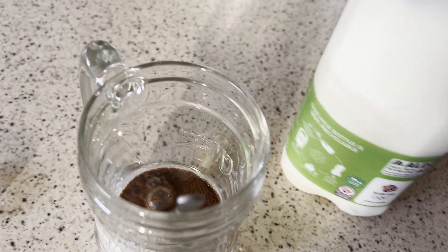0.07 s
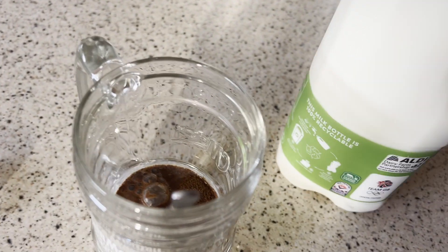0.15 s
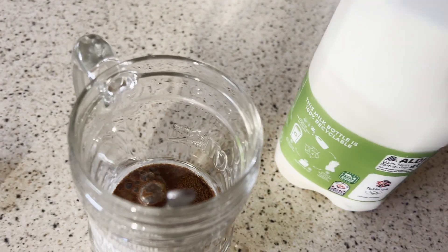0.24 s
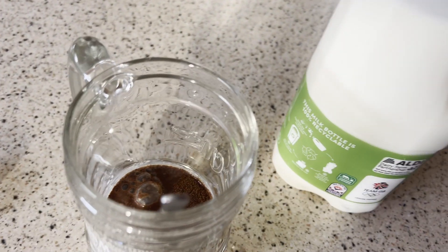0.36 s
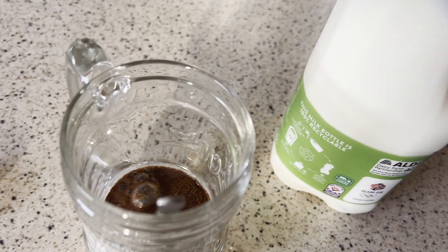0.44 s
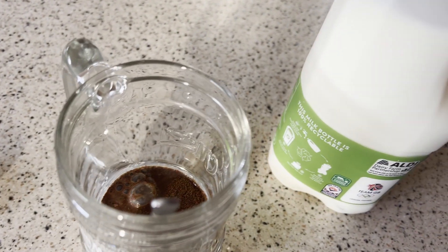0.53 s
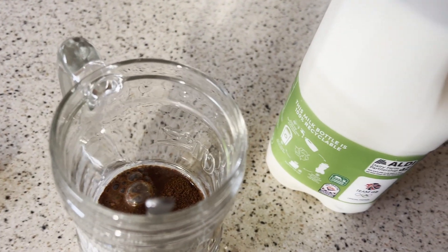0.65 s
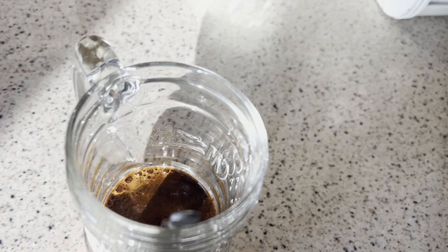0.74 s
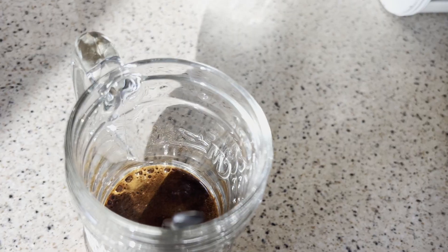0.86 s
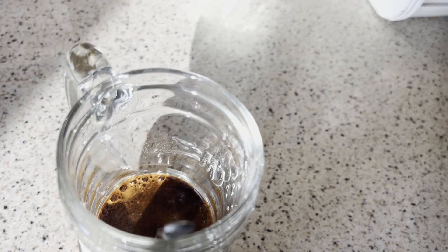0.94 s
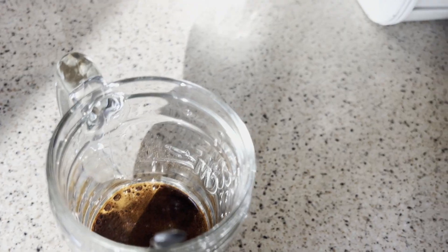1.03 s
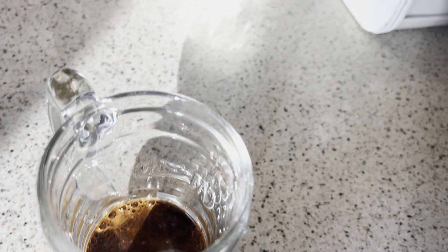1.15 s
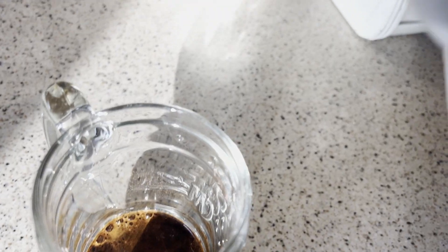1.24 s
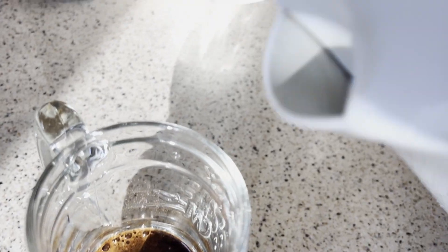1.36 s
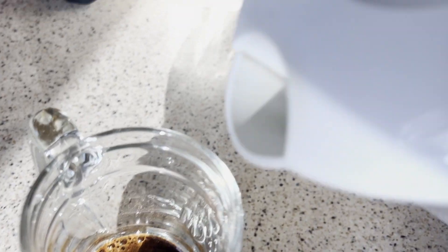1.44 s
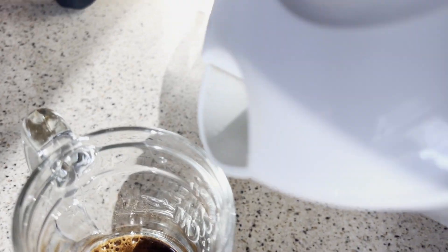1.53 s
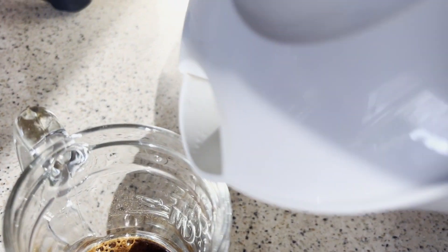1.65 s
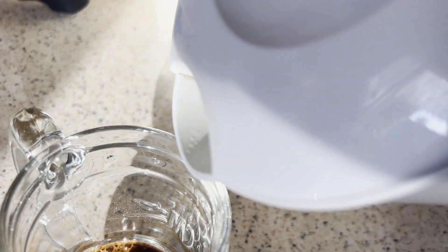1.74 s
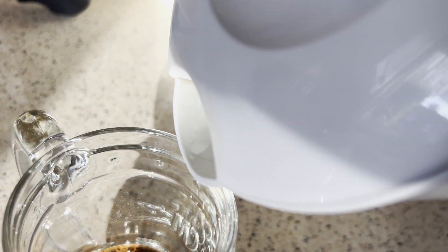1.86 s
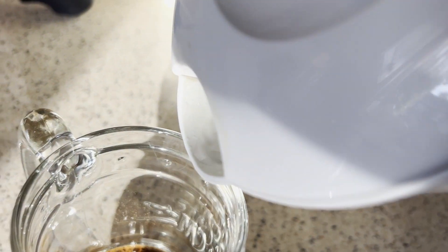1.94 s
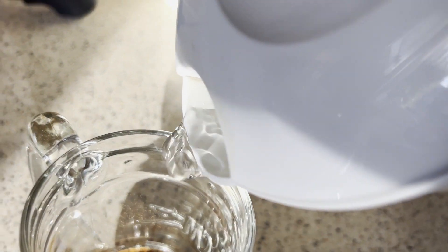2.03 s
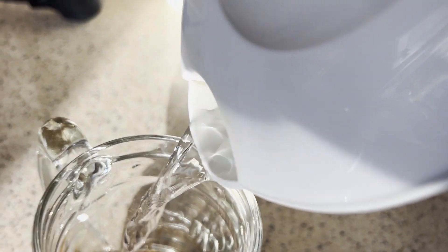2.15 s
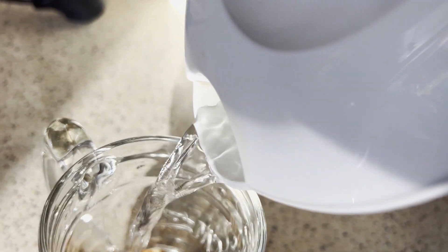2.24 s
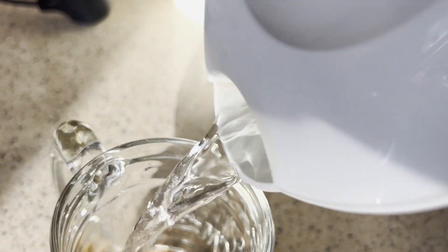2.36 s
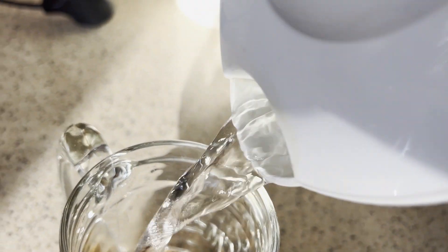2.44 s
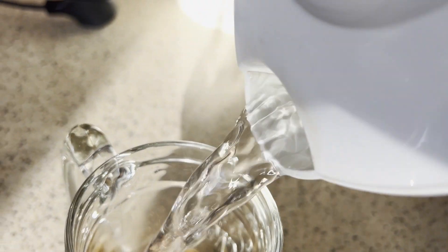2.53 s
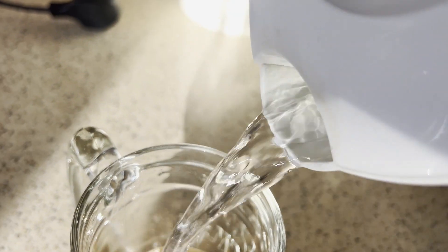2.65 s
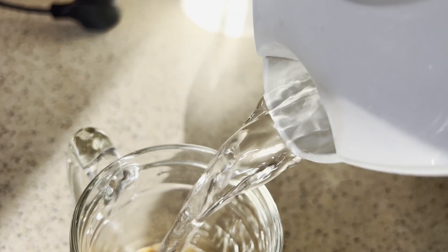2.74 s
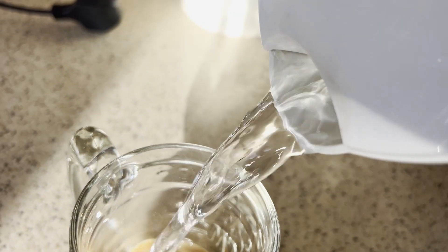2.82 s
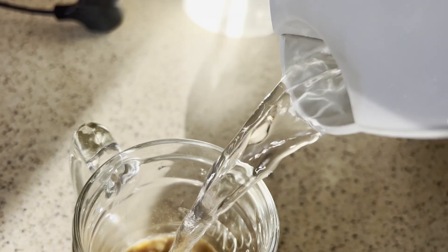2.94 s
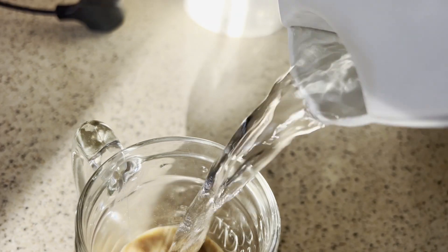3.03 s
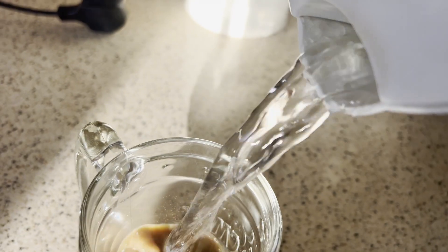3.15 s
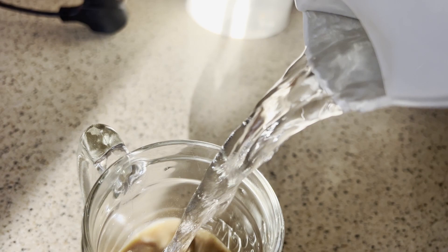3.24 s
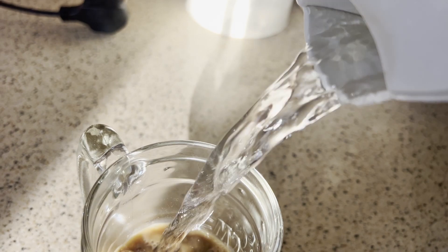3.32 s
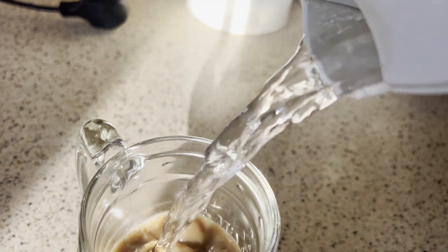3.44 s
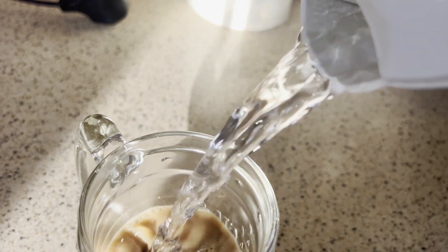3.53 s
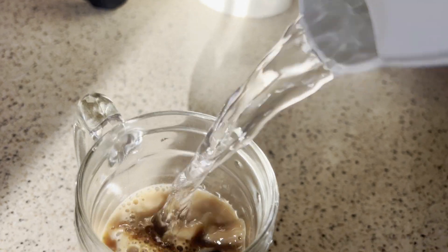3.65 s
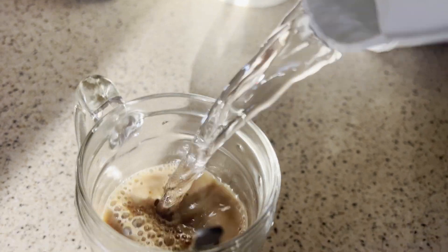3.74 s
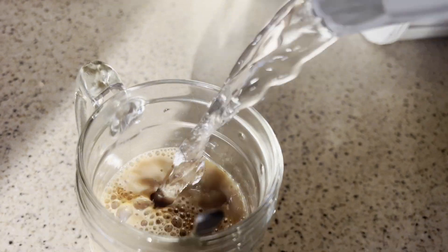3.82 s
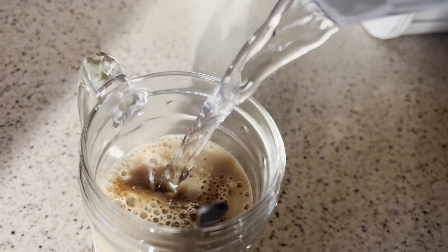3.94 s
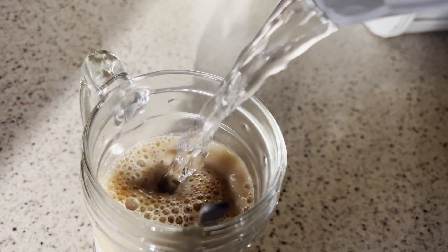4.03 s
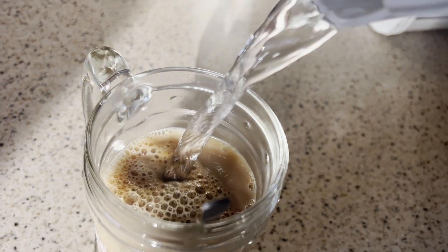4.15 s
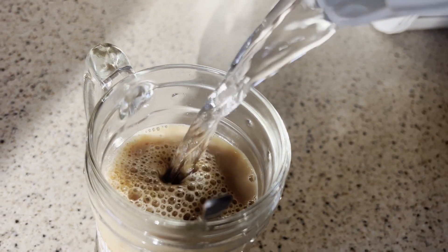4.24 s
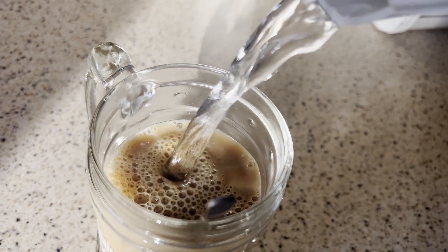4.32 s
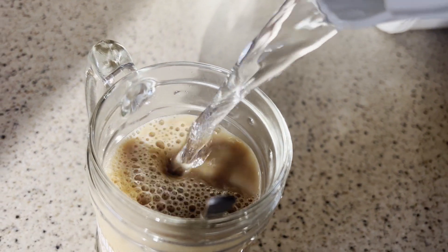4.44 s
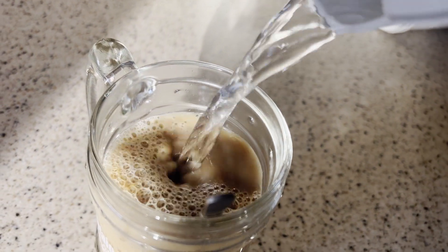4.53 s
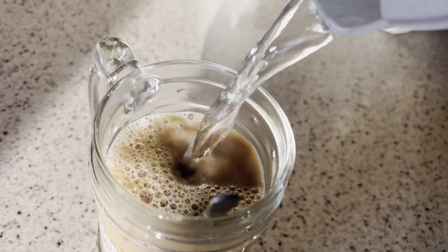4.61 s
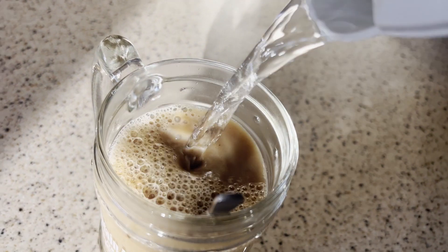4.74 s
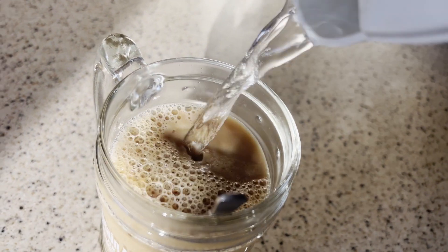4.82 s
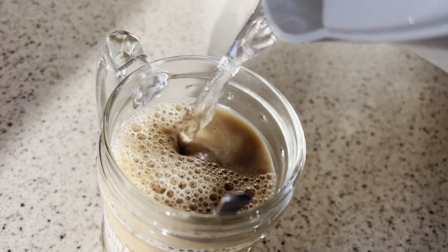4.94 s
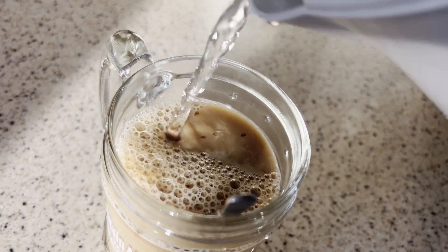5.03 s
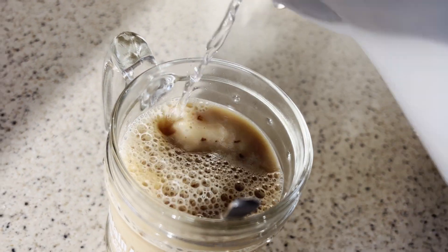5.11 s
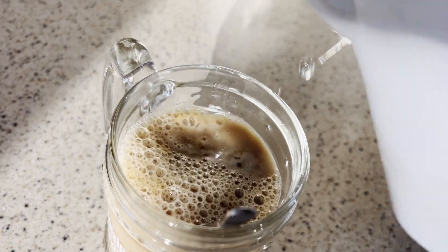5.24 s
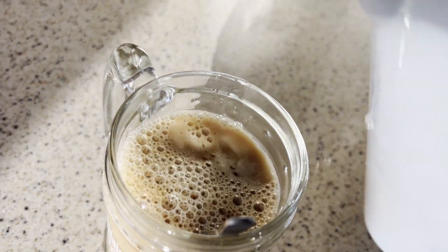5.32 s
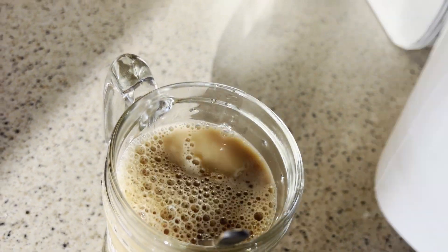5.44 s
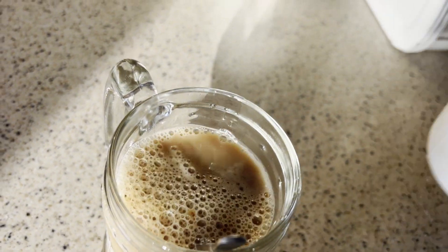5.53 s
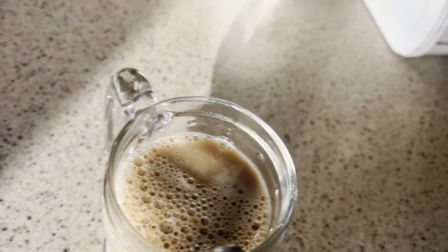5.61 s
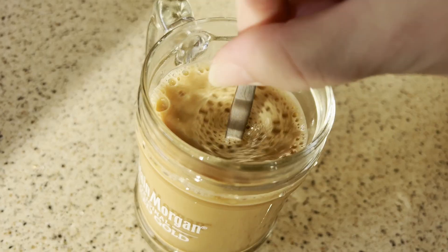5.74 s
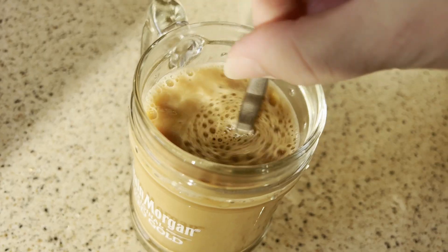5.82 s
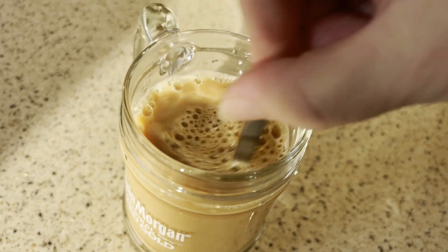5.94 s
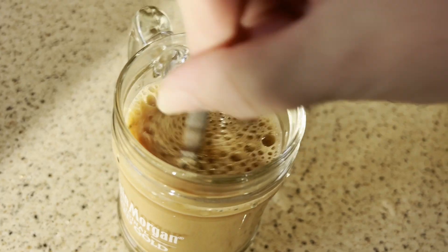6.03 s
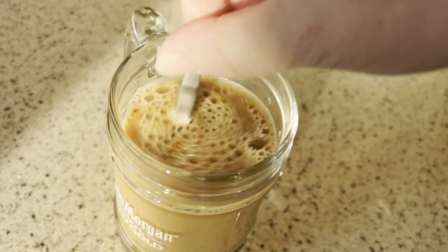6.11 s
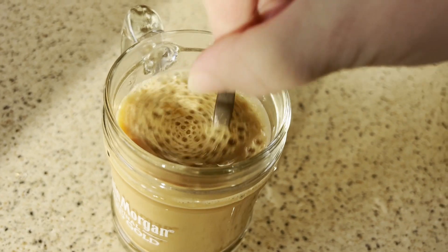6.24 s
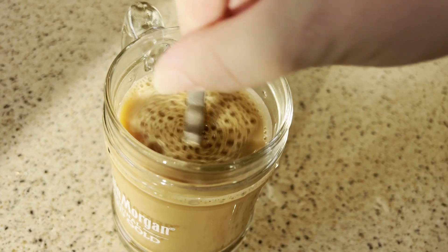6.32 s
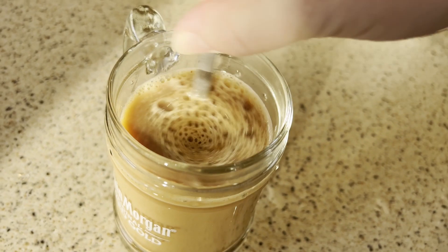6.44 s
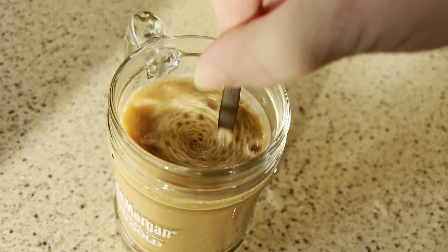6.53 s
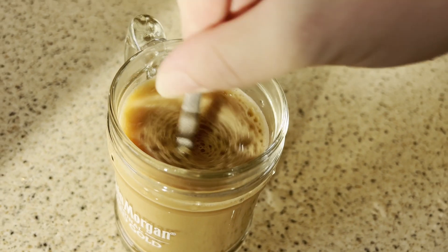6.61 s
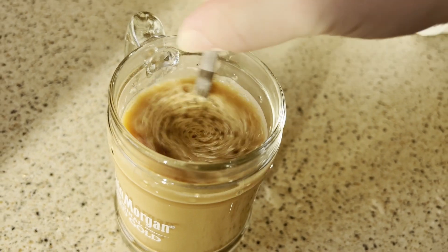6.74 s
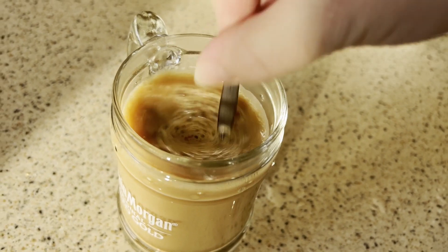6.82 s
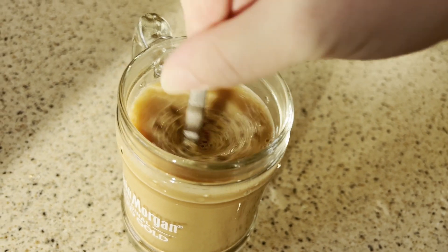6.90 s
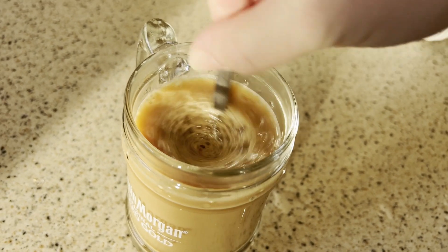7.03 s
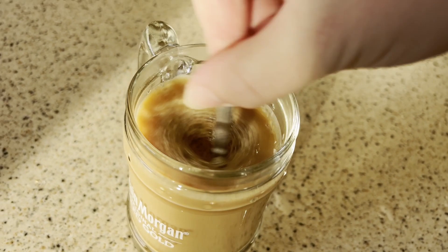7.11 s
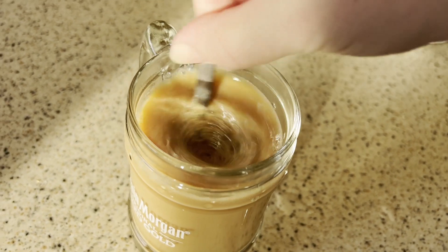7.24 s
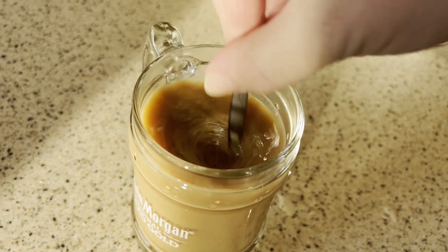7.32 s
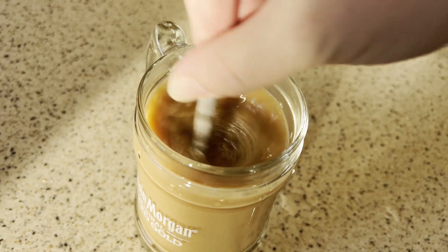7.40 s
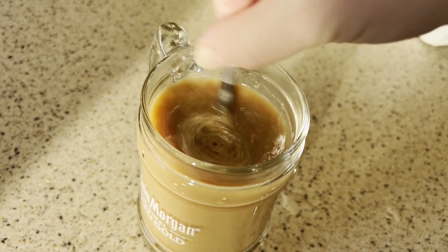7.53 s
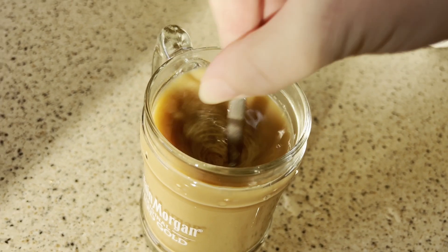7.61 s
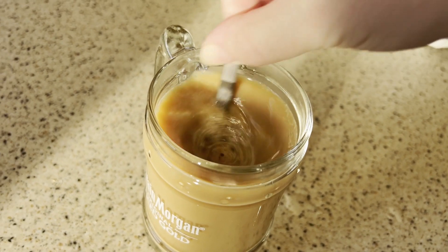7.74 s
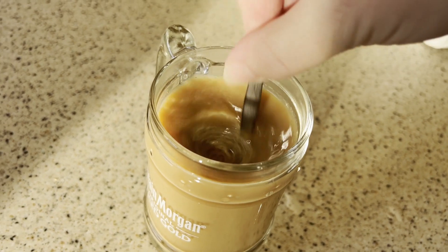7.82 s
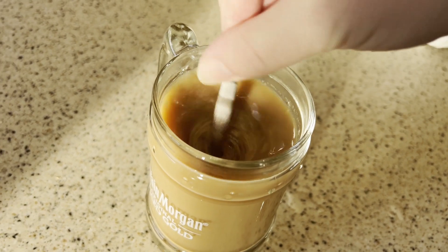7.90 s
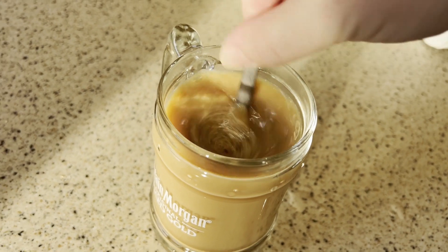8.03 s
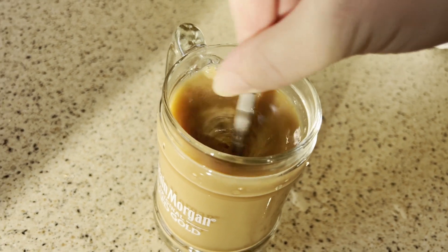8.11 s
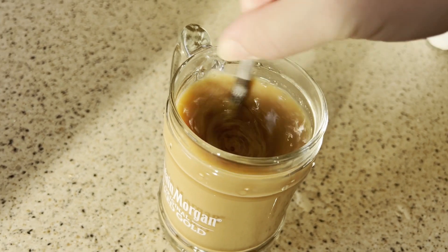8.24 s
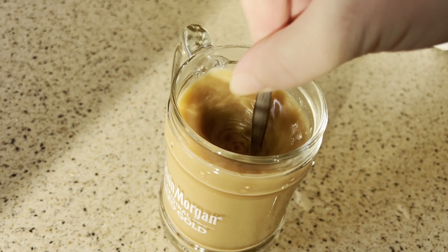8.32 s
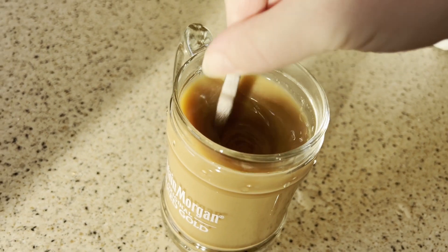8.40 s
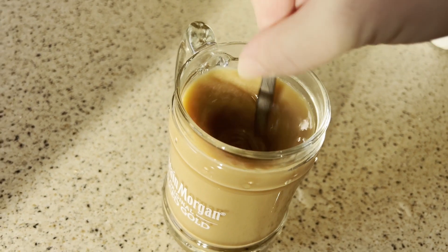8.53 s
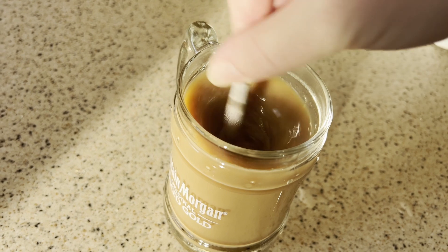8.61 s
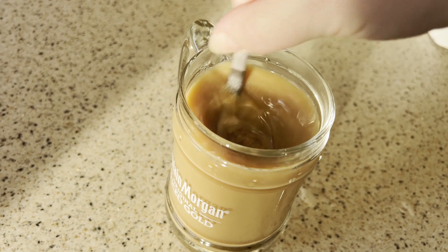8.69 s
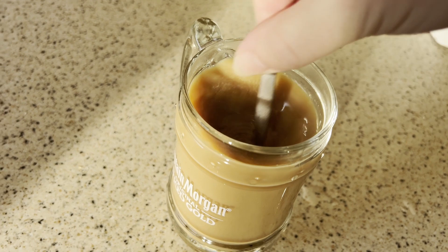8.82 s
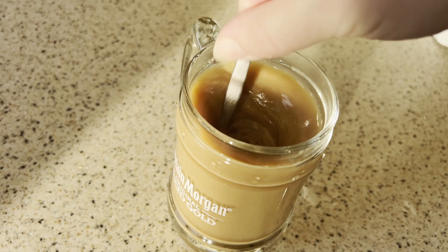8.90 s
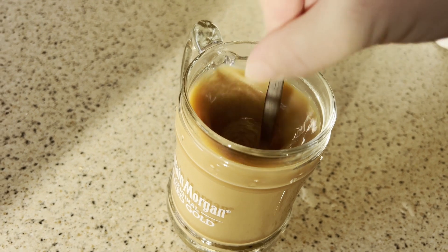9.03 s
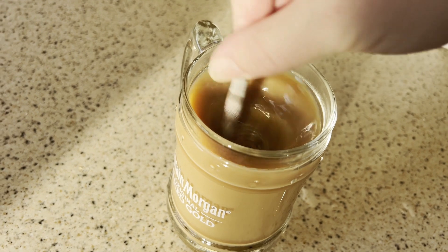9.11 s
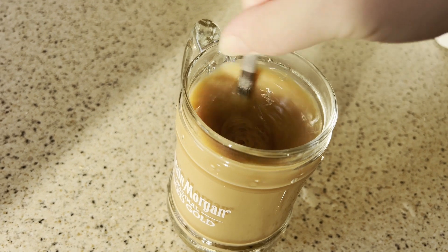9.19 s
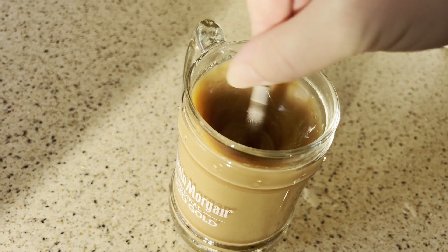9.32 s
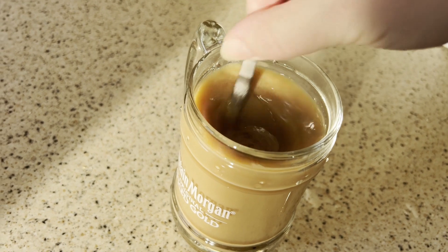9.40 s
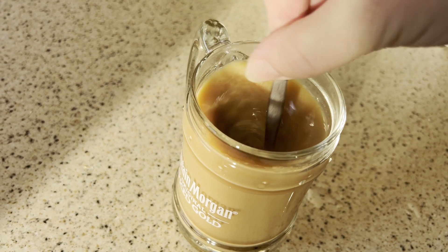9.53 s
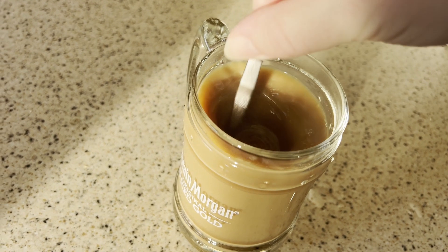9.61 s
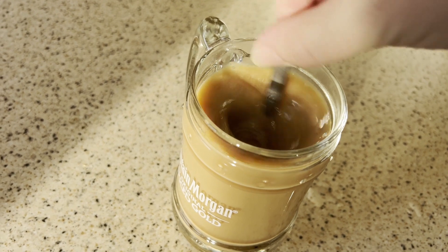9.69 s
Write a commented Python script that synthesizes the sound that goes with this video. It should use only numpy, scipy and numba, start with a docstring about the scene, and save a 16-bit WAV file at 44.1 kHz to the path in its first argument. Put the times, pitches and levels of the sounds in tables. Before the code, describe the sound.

Close stereo pickup in a small hard kitchen. A short gritty scrape and dull bump on the worktop, a faint kettle switch click, then a quiet gap. Hot water pours into a glass mug, splashing and gurgling, its hollow ring rising as it fills while the mug's low tone sinks. The flow thins, foam fizzes, and a metal spoon stirs briskly with irregular clinks and soft worktop booms to the end.

```python
"""Something scrapes over a worktop, a kettle clicks off, and hot water is poured into a glass mug for instant coffee.
Splashes and bubbles ring the air above the liquid, higher as the mug fills, while the loaded mug sinks in pitch.
Then a steel spoon stirs: each knock rings the liquid-damped glass and makes the worktop boom.
Foam fizzes, the coffee laps, and a small hard room answers over a low house rumble."""
import sys
import numpy as np
from scipy import signal
from scipy.fft import rfft, irfft, next_fast_len
from scipy.io import wavfile
from numba import njit

SR = 44100
rng = np.random.default_rng(int(sys.argv[2]) if len(sys.argv) > 2 else 0)


def digitize_waveform(pressure):
    """Quantize a signal to 16-bit integers and store it at the path in sys.argv[1].

    Rows of a 2-D input are taken as channels; values are limited to [-1, 1].
    """
    field = np.atleast_2d(pressure).T
    bounded = np.clip(field, -1, 1)
    quanta = np.round(bounded * 32767).astype(np.int16)
    wavfile.write(sys.argv[1], SR, quanta)


N = 430416
T = np.arange(N) / SR  # time in s
AGE = T[:SR // 10]  # time since the start of a short sound, in s
POUR_START_S, POUR_END_S = 2.21, 5.75

# strength of the stream from the kettle: start_s, level_db [s, dB]
FLOW = [(2.22, -58.5), (2.4, -49), (2.47, -47), (3.57, -47), (3.71, -47.5), (3.82, -51.5), (4.96, -60),
        (5.56, -79), (5.7, -104)]
# spoon knocks; hard steel-on-glass contacts tick, deep ones ring the base:
# start_s, strength_db, hardness_db, depth_db [s, dB, dB, dB]
KNOCKS = [(5.8769, -18, -13.5, -33), (5.901, -19, -19, -30), (5.9118, -22.5, -19, -22),
          (5.9888, -22.5, -21.5, -20), (6.0132, -24.5, -38, -21), (6.106, -20.5, -30.5, -13.5),
          (6.1999, -14, -21.5, -20.5), (6.2371, -29, -23, -13), (6.331, -34, -34, -7.5),
          (6.4951, -24, -10.5, -20.5), (6.5933, -22, -16, -16), (6.7712, -21, -16, -16.5),
          (6.8603, -19.5, -26.5, -8.5), (6.974, -28, -25, -30), (7.007, -28, -36, -12.5),
          (7.0549, -26, -13.5, -33), (7.1214, -25.5, -24.5, -8.5), (7.2012, -27.5, -8, -18),
          (7.2855, -23, -24, -9.5), (7.378, -22.5, -28, -8.5), (7.4732, -27.5, -19, -13),
          (7.5608, -31, -20.5, -12.5), (7.6386, -20.5, -17, -16.5), (7.745, -34.5, -23, -6.5),
          (7.8259, -24, -25, -15.5), (7.871, -24, -37, -12), (7.9911, -36.5, -25, -6),
          (8.104, -19, -11, -15.5), (8.2774, -18.5, -17.5, -9), (8.331, -20.5, -25, -44),
          (8.3706, -17, -23, -22.5), (8.4268, -32.5, -2.5, -17), (8.5026, -21.5, -8.5, -12),
          (8.6008, -20, -18.5, -18), (8.6793, -20.5, -22, -11), (8.7089, -24.5, -23.5, -22),
          (8.8549, -21.5, -17.5, -21), (8.8829, -29, -25, -31), (8.921, -29, -11.5, -21),
          (8.98, -30, -12.5, -32), (9.0352, -26, -27, -8.5), (9.0778, -20.5, -28, -13),
          (9.1472, -25.5, -14, -18), (9.181, -26.5, -27, -13.5), (9.2284, -33.5, -11.5, -4),
          (9.3017, -24, -20, -32), (9.3217, -18, -26.5, -11.5), (9.3885, -25, -16.5, -21),
          (9.434, -22, -24.5, -14), (9.5421, -20, -17, -37), (9.5871, -27.5, -17, -17.5),
          (9.6083, -23, -24, -29), (9.6289, -26, -12, -25), (9.7242, -16, -18, -28)]
# what the full mug and the spoon ring with: pitch_hz, t60_s, level_db [Hz, s, dB]
MUG_MODES = [(453.4, 0.048, -5.5), (571, 0.026, 3.5), (659, 0.068, -3), (730.5, 0.13, -9.5),
             (946, 0.025, 6.5), (1077, 0.0067, -12), (1213, 0.047, -2), (1420, 0.042, -11),
             (1466, 0.021, 8.5), (1533, 0.05, -3), (1711, 0.078, -11.5), (2010, 0.15, -15.5),
             (2180, 0.019, 8.5), (2384, 0.029, 0.5), (2617, 0.026, 10.5), (2836, 0.024, 6.5),
             (3475, 0.023, 6.5), (3832, 0.021, 9), (4206, 0.025, 8.5), (5183, .015, -43), (5960, 0.0047, 9),
             (7010, 0.027, -1.5), (7665, 0.015, 8), (8360, 0.032, 1.5)]
# strength of the swirling liquid and foam: start_s, level_db [s, dB]
SWIRL_LEVEL = [(5.72, -68), (6.4, -69), (7.2, -53), (8.0, -69), (8.6, -56), (9.76, -66.5)]


def stream():
    """Bubbles ring the air in the mug, churning shakes the mug and swarms of tiny bubbles crackle above."""
    # spray colour: pitch_hz, level_db [Hz, dB]
    spray_colour = [(900, -27), (2000, 10), (2500, 2), (3050, -9.5), (3800, 0), (5500, -2.5), (8000, -4.5),
                    (10000, 1.5), (12500, -1), (16000, 10)]
    bubbling_db, churning_db = -4.5, -8.5  # against the flow
    spray_db, spray_share = -15.5, 0.91  # the share is dB of spray per dB of flow
    # at first the milk is shallow: the stream bubbles almost as loudly but hardly churns
    shallow_bubbling_db, shallow_churn_db = -1, -40
    # the stream's head spatters as it lands, coming and going at this rate
    spatter_s, spatter_db, spatter_db_per_s = 2.28, -46, 208

    flow_db, = curves(FLOW)
    air_hz, mug_hz = filling()
    bubble_level_db = flow_db + bubbling_db + shallow_bubbling_db * shallow()
    churn_level_db = flow_db + churning_db + shallow_churn_db * shallow()
    spatter_level_db = spatter_db - spatter_db_per_s * np.abs(T - spatter_s)
    spray_level_db = np.maximum(spray_share * flow_db + spray_db, spatter_level_db)

    bubble_times = bursts(POUR_START_S, POUR_END_S, count=260, size=6)
    push = bubbles(bubble_times, 603, 1580, cycles=15.7, spread_db=4.5)
    splatter = noise(N, apart=0.27) + 8 * patter(rate=270, spread_db=7)
    push = push + amp(-2.5) * lag(splatter, 0.00034)
    air = np.array([resonate(resonate(p, air_hz, 3.7), air_hz, 0.84) for p in push])

    shove = noise(N, apart=0.37) + 9 * patter(rate=170, spread_db=6.5)
    churn = np.array([resonate(resonate(p, mug_hz, 4.6), mug_hz, 0.16) for p in shove])
    churn = churn + amp(-15.0) * band(shove, 347, 556)

    fizz_times = bursts(POUR_START_S, POUR_END_S, count=230, size=14)
    fizz = bubbles(fizz_times, 2480, 13600, cycles=39, spread_db=5.5)
    spray = colour(fizz + amp(-7.0) * unit(noise(N, apart=0.95)), spray_colour)
    # the stream wobbles, so its spray comes in surges
    surge_db = 4 * np.interp(T, np.linspace(0, T[-1], 400), rng.standard_normal(400))
    spray = spray * amp(surge_db)

    water = unit(air) * amp(bubble_level_db) * pan(db=8.5)
    water = water + unit(churn) * amp(churn_level_db) * pan(db=5.5)
    water = water + unit(spray) * amp(spray_level_db) * pan(db=5.5)
    return between(POUR_START_S, POUR_END_S) * water


def filling():
    """As the flow fills the mug, the shorter air column rises in pitch and the loaded mug sinks; gives both in Hz."""
    air_empty_hz, air_full_hz = 823, 1380
    mug_empty_hz, mug_full_hz = 540, 129.5
    flow_db, = curves(FLOW)
    poured = np.cumsum(amp(flow_db) ** 2 * between(POUR_START_S, POUR_END_S))
    fill = poured / poured[-1]
    air_hz = 1 / ((1 - fill) / air_empty_hz + fill / air_full_hz)
    mug_hz = mug_empty_hz * (mug_full_hz / mug_empty_hz) ** fill
    return air_hz, mug_hz


def shallow():
    """One as the pour starts, falling to zero as the liquid gains depth."""
    return np.exp(-(after(POUR_START_S) / 0.23) ** 2)


def gulps():
    """Big air pockets go under: tiny bubbles splash, the air in the mug rings and the mug thumps the worktop."""
    # air pockets driven under by the stream; splash and thump are against the strength, before the trims below:
    # start_s, strength_db, splash_db, thump_db [s, dB, dB, dB]
    gulp_table = [(2.174, -49, 6.5, -24), (2.336, -28.5, -18, -45), (2.353, -25.5, -44, -41),
                  (2.43, -28, -18, -39), (2.561, -41, -3, -16), (2.608, -21.5, -12, -19),
                  (2.631, -22, -19, -20), (2.717, -21, -21, -20), (2.746, -23.5, -29, -21),
                  (2.769, -26.5, -34, -21), (2.868, -21.5, -15.5, -21), (2.914, -28.5, -11, -19.5),
                  (3.026, -27.5, -30, -26), (3.053, -31, -9, -18.5), (3.101, -35.5, -9.5, -21),
                  (3.15, -32.5, -6, -18.5), (3.182, -26.5, -16, -16.5), (3.214, -31, -10, -11),
                  (3.286, -24, -14, -24), (3.295, -24.5, -9, -17.5), (3.324, -28.5, -3, -19.5),
                  (3.427, -39, -1, -14), (3.453, -35.5, -11, -18), (3.512, -23.5, -18.5, -38),
                  (3.55, -31.5, -10.5, -26), (3.601, -25, -8.5, -24.5), (3.609, -22, -12, -25),
                  (3.729, -25.5, -20.5, -20.5), (3.871, -29, -13, -18), (3.911, -25, -11, -16.5),
                  (4.055, -34.5, -5.5, -21), (4.121, -25, -13, -16.5), (4.208, -28.5, -9, -21),
                  (4.468, -40, -27, -17.5), (4.533, -35.5, -7.5, -5.5), (4.567, -36, -15, -15),
                  (4.601, -44, -6, -11.5), (4.757, -37.5, -4.5, -15.5), (4.838, -38.5, -15, -15),
                  (4.864, -47, -7, -13), (4.949, -44.5, -22, -26), (4.978, -41.5, -20, -22),
                  (5.145, -32, -12.5, -22)]
    # single drops, the first on the shallow milk, the last off the spout: start_s, pitch_hz, level_db [s, Hz, dB]
    drop_table = [(2.245, 6150, -29.5), (2.252, 2510, -22), (2.255, 4000, -27), (2.264, 2470, -38),
                  (2.263, 7400, -26), (2.287, 1290, -25), (5.257, 1410, -40.5)]
    ring_trim_db, splash_trim_db, thump_trim_db = -11.5, -4, -0.5

    out = np.zeros((2, N))
    air_hz, mug_hz = filling()
    for start_s, strength_db, splash_db, thump_db in gulp_table:
        i = int(start_s * SR)
        hz, low_hz = air_hz[i], mug_hz[i]

        # a shallow air column rings briefly
        ring_hz = hz * (0.96 + 0.028 * rng.standard_normal())
        air = unit_hit(ring(ring_hz, t60=26 / hz, apart=0.24, glide=0.11))
        breath = band(noise(len(AGE), apart=0.28), hz * 0.7, hz * 1.09) * fade(t60=32 / hz)
        air = air + amp(-7.5) * unit_hit(breath)
        air = lag(air, 0.00012) * (1 - fade(t60=0.0036))

        body = unit_hit(ring(rng.uniform(425, 505), t60=0.078, apart=1.0))
        low = band(noise(len(AGE), apart=0.08), low_hz * 0.535, low_hz * 1.47) * fade(t60=0.089)
        body = (body + amp(-5.0) * unit_hit(low)) * (1 - fade(t60=0.0088))

        splash = np.zeros((2, N // 50))
        short_age = AGE[:SR // 100]
        for delay_s in np.append(0, rng.exponential(0.0087, size=5)):
            blip = ring(rng.uniform(2150, 9560), t60=0.011, apart=0.94, glide=0.57, age=short_age)
            tick = noise(SR // 100, apart=0.67) * fade(0.0041, short_age)
            bright_tick = np.diff(tick, prepend=0) / 2
            droplet = blip * pan(db=12.5) + amp(10.0) * bright_tick
            add(splash, min(delay_s, .05), droplet * fade(0.056, delay_s))

        add(out, start_s, unit_hit(air) * amp(strength_db + ring_trim_db) * pan(db=8))
        add(out, start_s, unit_hit(body) * amp(strength_db + thump_db + thump_trim_db) * pan(db=2.5))
        add(out, start_s, unit_hit(splash) * amp(strength_db + splash_db + splash_trim_db))
    for start_s, pitch_hz, level_db in drop_table:
        add(out, start_s, ring(pitch_hz, t60=0.0073, glide=0.032) * amp(level_db) * pan(db=8))
    return out


def spoon():
    """Strength, hardness and depth set how a knock rings the mug; the spoon chatters and the worktop booms."""
    # pitch ranges of a knock, in the order tick, wall, base, rim, bowl:
    # low_hz, high_hz, rise_s, clatter_t60_s, clatter_db, trim_db, left_minus_right_db,
    # hardness_share, depth_share [Hz, Hz, s, s, dB, dB, dB, dB per dB, dB per dB]
    register_table = [(5214, 16000, 0.00013, 0.038, -1, -7.5, 8, 1, -0.057),
                      (1025, 1729, 0.0014, 0.025, -7, -14, 6.5, 0.037, -0.038),
                      (386, 960, 0.0055, 0.06, -13.5, -3, 4, 0.028, 1),
                      (1790, 3000, 0.00073, 0.15, -6, -20, 2.5, 0.17, -.2),
                      (3030, 5786, 0.0005, 0.12, -6, -17.5, 10, 0.49, -0.18)]
    # worktop and cupboards boom after each knock: pitch_hz, t60_s, level_db [Hz, s, dB]
    worktop_modes = [(62.6, 0.68, -12), (107.8, 0.26, -7.5), (158, 0.18, -1.5), (190, 0.037, -53),
                     (224, 0.17, -0.5), (286.2, 0.061, 1)]
    mode_scatter_db = 2.8  # each knock lands on another spot, so the modes share its force differently
    chatter_from_s, chatter_to_s, chatter_db = 0.0072, .035, -19  # delay limits, level against the knock
    boom_db, boom_per_strength, boom_per_hardness = -23, 0.77, 0.19  # dB, then dB per dB

    out, long_age = np.zeros((2, N)), T[:SR // 3]
    for start_s, strength_db, hardness_db, depth_db in KNOCKS:
        knock = 0
        for lo, hi, rise, clatter_t60, clatter_db, trim_db, pan_db, hard_share, deep_share in register_table:
            modes = 0
            for hz, t60, mode_db in MUG_MODES:
                if lo <= hz < hi:
                    # the sloshing liquid and the pressing spoon detune the glass from knock to knock
                    knock_hz = hz * (1 + 0.011 * rng.standard_normal())
                    mode = ring(knock_hz, t60 * rng.uniform(0.77, 1.05), apart=0.88)
                    modes = modes + mode * amp(mode_db + mode_scatter_db * rng.standard_normal())
            clatter = band(lag(noise(len(AGE), apart=0.98), -.0002), lo, hi)
            clatter = clatter * (fade(clatter_t60) + 3.0 * fade(t60=0.0091))
            swell = 1 - np.exp(-(AGE / rise) ** 2)
            part = (unit_hit(modes) + amp(clatter_db) * unit_hit(clatter)) * swell
            gain = amp(strength_db + trim_db + hard_share * hardness_db + deep_share * depth_db)
            knock = knock + unit_hit(part) * gain * pan(pan_db)
        add(out, start_s, knock)
        chatter_s = chatter_from_s + (chatter_to_s - chatter_from_s) * rng.random()
        add(out, start_s + chatter_s, knock * amp(chatter_db))

        boom = 0
        for hz, t60, mode_db in worktop_modes:
            boom_hz = hz * (1 + 0.03 * rng.standard_normal())
            boom = boom + ring(boom_hz, t60, apart=0.22, age=long_age) * amp(mode_db)
        boom = boom * (1 - np.exp(-(long_age / 0.0071) ** 2))
        boom_level_db = boom_per_strength * strength_db + boom_per_hardness * hardness_db + boom_db
        add(out, start_s, boom * amp(boom_level_db) * pan(db=4))
    return out


def grazes():
    """The spoon brushes the glass, louder with the swirl, ringing its upper modes and damping them at once."""
    swirl_db, = curves(SWIRL_LEVEL)
    glass = sum(ring(hz, t60=.014) * amp(db) for hz, _, db in MUG_MODES if 1000 < hz < 5000)
    brushes = patter(rate=36, spread_db=6.5)[None]
    touches = signal.fftconvolve(brushes, glass, axes=1)[:, :N]
    return unit(touches) * amp(swirl_db - 5.5) * between(KNOCKS[0][0], 10) * pan(db=6.5)


def swirl():
    """The whirling coffee laps, folds small bubbles under, and its foam fizzes."""
    # colour of the fizz: pitch_hz, level_db [Hz, dB]
    fizz_colour = [(60, -24), (170, -12), (330, -7.5), (675, 8), (900, 3.5), (1480, 11.5), (1900, -2.5),
                   (7500, -16), (16000, -24)]
    level_db, = curves(SWIRL_LEVEL)
    fizz = noise(N, apart=0.89) + 5 * patter(rate=250, spread_db=6.5)
    fizz = unit(colour(fizz, fizz_colour))
    laps = bubbles(bursts(6.6, 15.0, count=60, size=3), 540, 2740, cycles=16, spread_db=2)
    return (fizz + amp(-8.5) * laps) * amp(level_db) * between(5.72, 10) * pan(db=4.5)


def foam():
    """Bubble skins snap at the surface: loud ticks over the hiss and fine fizz of countless small ones."""
    # foam builds up, holds while the stream feeds it, then collapses; its hiss and finest fizz linger
    built_s, fed_until_s, rise_db_per_s = 3, 5.41, 20
    snap_db, snap_fall_db_per_s = -60, 38
    hiss_db, hiss_fall_db_per_s = -70.5, 9
    fizz_db, fizz_fall_db_per_s = -67.5, 2

    growth_db = -rise_db_per_s * np.maximum(built_s - T, 0)
    unfed_s = after(fed_until_s)
    ticks = np.array([patter(rate=32, spread_db=11)] * 2)
    snaps = band(lag(ticks, .00003) + 0.01 * noise(N, apart=.5), 10600, 13200)
    hiss = band(noise(N, apart=0.98) + 4 * patter(rate=470, spread_db=9.0), 1150, 11000)
    fizz = band(noise(N, apart=0.54), 12300, 16200)
    crackle = unit(snaps) * amp(snap_db - snap_fall_db_per_s * unfed_s)
    crackle = crackle + unit(hiss) * amp(hiss_db - hiss_fall_db_per_s * unfed_s) * pan(db=11)
    crackle = crackle + unit(fizz) * amp(fizz_db - fizz_fall_db_per_s * unfed_s)
    return crackle * amp(growth_db) * between(POUR_START_S, 10)


def slide():
    """Something is shoved over the worktop: gritty friction over a rumble, with a bump or two."""
    # shoves, each swelling until it stops: start_s, length_s, end_level_db [s, s, dB]
    shove_table = [(0, 0.019, -43.5), (0.192, 0.085, -33.5)]
    # dull bumps on the worktop: start_s, level_db [s, dB]
    bump_table = [(.073, -29), (.375, -52)]
    # colour of the friction: pitch_hz, level_db [Hz, dB]
    grit_colour = [(60, -25), (150, -9), (430, -15), (560, 3), (780, -10.5), (1300, -1), (1900, -15.5),
                   (2800, -12.5), (4000, -19.5), (8400, -21.5), (16000, -26)]
    rumble_colour = [(25, -29), (57, 4.5), (90, -16.5), (220, -18), (400, -27), (1500, -74.5)]  # (Hz, dB)
    swell_db, stop_t60_s = 19, 0.035
    rub_db, rumble_db = -56, -44

    # light rubbing and rumble go on through the handling, then die away
    handling = fade(0.92, after(0.15))
    friction = amp(rub_db) * handling
    for start_s, length_s, end_db in shove_table:
        to_go = np.clip(1 - after(start_s) / length_s, 0, 1)
        stopping = fade(stop_t60_s, after(start_s + length_s))
        friction = friction + (T >= start_s) * amp(end_db - swell_db * to_go) * stopping
    grit = colour(noise(N, apart=0.82) + 5 * patter(rate=700, spread_db=4.5), grit_colour)
    rumble = colour(noise(N, apart=0.066), rumble_colour)
    out = unit(grit) * friction + unit(rumble) * amp(rumble_db) * handling
    out = out * between(-1, 0.55)
    for start_s, level_db in bump_table:
        add(out, start_s, thud() * amp(level_db))
    # it catches and knocks
    catch = band(noise(len(AGE), apart=0.46), 1470, 1810) * fade(t60=0.025)
    add(out, .193, unit_hit(catch) * amp(-50.5))
    return out * pan(db=2)


def thud(hz=58):
    """The lowest boom of the worktop: a soft-starting, dying sine."""
    age = T[:SR // 4]
    return ring(hz, t60=0.25, apart=.07, age=age) * (1 - fade(0.021, age))


def kettle():
    """The switch snaps off with a small thump; the hot water sings unevenly in narrow bands of noise."""
    # faint singing, and again as the kettle is tipped back:
    # start_s, end_s, pitch_hz, width_hz, level_db [s, s, Hz, Hz, dB]
    singing_table = [(.3, 1.84, 4500, 320, -91), (.77, 1.02, 3220, 400, -83), (.85, 1.8, 2160, 400, -87),
                     (5.25, 5.7, 2290, 600, -77)]
    switch_s, click_db, thump_db = .653, -56.5, -40.5

    out = np.zeros((2, N))
    snap = band(noise(len(AGE), apart=0.61), 870, 1780) + amp(-30.5) * band(noise(len(AGE)), 300, 14000)
    click = unit_hit(snap * fade(t60=0.012))
    thump = ring(57, t60=0.25, apart=.1) + 0.81 * ring(520, t60=0.021)
    thump = thump * (1 - fade(t60=0.0067)) * fade(t60=0.49)
    add(out, switch_s, click * amp(click_db) + thump * amp(thump_db))
    for start_s, end_s, hz, width_hz, level_db in singing_table:
        waver_db = 2 * np.interp(T, np.linspace(0, T[-1], 100), rng.standard_normal(100))
        singing = unit(band(noise(N), hz - width_hz / 2, hz + width_hz / 2))
        out += singing * amp(level_db + waver_db) * between(start_s, end_s)
    return out


def kitchen(x):
    """Near surfaces throw back quick echoes; the small hard room adds a short tail of fading noise."""
    age = T[:SR // 2]
    tail = band(noise(len(age), apart=0.47), 134, 740) * fade(0.35, age) * amp(-36.0)
    tail = tail + band(noise(len(age)), 970, 4240) * fade(0.35, age) * amp(-42)
    tail = tail + band(noise(len(age)), 3760, 9600) * fade(0.32, age) * amp(-40)
    response = tail * np.clip(age / 0.0043, 0, 1)
    # echoes: (channel, delay s, dB)
    for channel, s, db in [(0, 0.0053, -15.5), (1, 0.0061, -11), (0, 0.029, -33.5), (1, 0.024, -31)]:
        response[channel, int(s * SR)] += amp(db)
    return x + signal.fftconvolve(x, response, axes=1)[:, :N]


def room_tone():
    """Low house rumble and a thin hiss, both coloured noise."""
    # rumble level before a 4.5 dB lift: start_s, level_db [s, dB]
    rumble_table = [(0.5, -74), (0.93, -67.5), (1.88, -76), (3.22, -60.5), (6.6, -71.5), (6.95, -63),
                    (9.7, -64)]
    # colour of the rumble: pitch_hz, level_db [Hz, dB]
    rumble_colour = [(25, -17.5), (55, -3), (118, -14.5), (220, -17), (300, -19), (950, -33), (3900, -43.5),
                     (9000, -48), (12000, -73)]
    rumble_db, = curves(rumble_table)
    rumble = unit(colour(noise(N, apart=0.37), rumble_colour)) * amp(rumble_db + 4.5)
    hiss = unit(band(noise(N, apart=0.56), 11200, 13500)) * amp(-94)
    return rumble + hiss


def bubbles(times, lo_hz, hi_hz, cycles, spread_db):
    """One rising blip per bubble, each of its own size and strength; small, high ones tend to die sooner."""
    out = np.zeros((2, N))
    for s in times:
        hz = lo_hz * (hi_hz / lo_hz) ** rng.random()
        t60 = cycles / hz * rng.uniform(.5, 1.5)
        blip = ring(hz, t60, apart=1, glide=.12, age=T[:int(t60 * SR) + 2])
        add(out, s, blip * amp(spread_db * min(rng.exponential(), 3)))
    return unit(out)


def bursts(start, end, count, size):
    """Times in s that come in count little swarms of size each."""
    swarms = np.linspace(start, end, count)[:, None] + rng.normal(0, .012, (count, 1))
    return (swarms + rng.exponential(.005, (count, size))).ravel()


def patter(rate, spread_db):
    """Random impulses of uneven size, rate per second on average."""
    hits = (rng.random(N) < rate / SR) * rng.choice([-1, 1], N)
    return hits * amp(spread_db * np.clip(rng.standard_normal(N), -2, 2))


def ring(hz, t60, apart=1, glide=0, age=AGE):
    """A dying sine, out of phase between the microphones; glide is the share its pitch rises by within t60."""
    phase = rng.uniform(0, 2 * np.pi) + apart * rng.choice([-1, 1]) * np.array([[.5], [-.5]])
    rise = 1 + glide * np.minimum(age / t60, 1) / 2
    return np.sin(2 * np.pi * hz * age * rise + phase) * fade(t60, age)


@njit
def resonate(x, hz, q):
    """State-variable band-pass with a moving centre: a hollow whose pitch changes."""
    y, b, l = np.empty(len(x)), 0., 0.
    for i in range(len(x)):
        g = np.tan(np.pi * hz[i] / SR)
        v = (b + g * (x[i] - l)) / (1 + g * (g + 1 / q))
        b, l, y[i] = 2 * v - b, l + 2 * g * v, v / q
    return y


def noise(size, apart=1):
    """Stereo noise; apart is the side's weight against the middle."""
    mid, side = rng.standard_normal((2, size))
    return np.array([mid + apart * side, mid - apart * side])


def band(x, lo_hz, hi_hz):
    """Band-pass filter that keeps the pitches between two limits."""
    return signal.lfilter(*signal.butter(2, [lo_hz, min(hi_hz, .45 * SR)], "band", fs=SR), x)


def colour(x, points):
    """Give a long sound a spectrum of (Hz, dB) points."""
    hz, db = np.transpose(points)
    size = next_fast_len(N, True)
    f = np.maximum(np.fft.rfftfreq(size, 1 / SR), 1)
    gain = amp(np.interp(np.log(f), np.log(hz), db))
    return irfft(rfft(x, size) * gain, size)[:, :N]


def lag(x, s):
    """The right microphone hears the sound s seconds after the left; negative s delays the left."""
    k = int(round(abs(s) * SR))
    late = np.pad(x, ((0, 0), (k, 0)))[:, :x.shape[1]]
    return np.array([x[0], late[1]] if s > 0 else [late[0], x[1]])


def pan(db):
    """Left and right gains, db apart, that average one."""
    g = amp([[db / 2], [-db / 2]])
    return g / g.mean()


def amp(db):
    """Decibels to gain."""
    return 10 ** (np.asarray(db) / 20)


def unit(x):
    """Scale a stereo sound so that its middle has rms one."""
    return x / np.sqrt(np.mean(x.mean(0) ** 2) + 1e-30)


def unit_hit(x):
    """Scale a stereo blow so that its middle has rms one over its first 20 ms."""
    return x / np.sqrt(np.mean(x.mean(0)[:SR // 50] ** 2) + 1e-30)


def fade(t60, age=AGE):
    """Exponential decay by 60 dB in t60 seconds."""
    return np.exp(-np.log(1000) * age / t60)


def between(start, end):
    """A gate with soft 20 ms edges."""
    return np.clip((T - start) / .02, 0, 1) * np.clip((end - T) / .02, 0, 1)


def after(s):
    """Seconds gone by since time s, zero before it."""
    return np.maximum(T - s, 0)


def curves(table):
    """The columns of a table, joined by straight lines in time."""
    s, *columns = np.transpose(table)
    return [np.interp(T, s, c) for c in columns]


def add(out, s, x):
    """Mix a short sound in at time s."""
    i = max(int(s * SR), 0)
    out[:, i:i + x.shape[1]] += x[:, :max(N - i, 0)]


def scene():
    """All sources answered by the kitchen, over the room tone."""
    water = stream() + gulps() + foam()
    stirring = spoon() + grazes() + swirl()
    return kitchen(water + stirring + slide() + kettle()) + room_tone()


def record(dry):
    """The microphones shed deep bass; their ports narrow the high treble and delay it on the left; the top is cut."""
    port_hz, port_lag_s, port_side_db = 6910, 0.00016, -19
    lean = signal.sosfilt(signal.butter(4, 36, "high", fs=SR, output="sos"), dry)
    size = next_fast_len(N, True)
    left, right = rfft(lean, size)
    above_hz = np.maximum(np.fft.rfftfreq(size, 1 / SR) - port_hz, 0)
    mid = (left + right) / 2
    # the difference between the channels shrinks over 1000 Hz above the port's pitch
    side = (left - right) / 2 * amp(port_side_db * np.minimum(above_hz / 1000, 1))
    late_left = (mid + side) * np.exp(-2j * np.pi * above_hz * port_lag_s)
    ported = irfft(np.array([late_left, mid - side]), size)[:, :N]
    return signal.sosfilt(signal.ellip(8, .2, 70, 16200, fs=SR, output="sos"), ported)


dry = scene()
out = record(dry)
digitize_waveform(out)
```